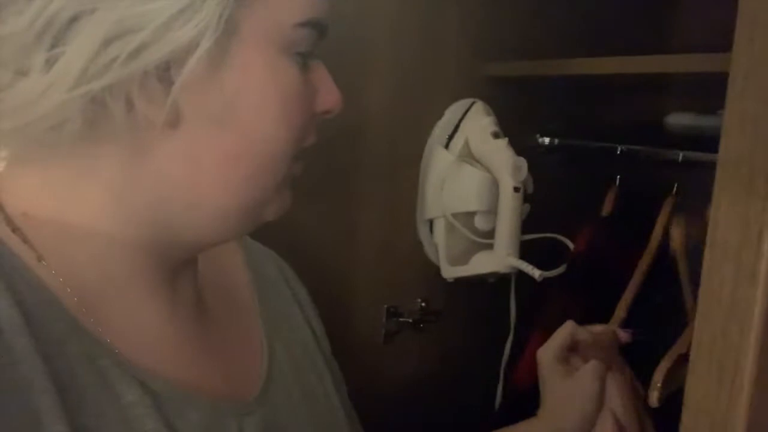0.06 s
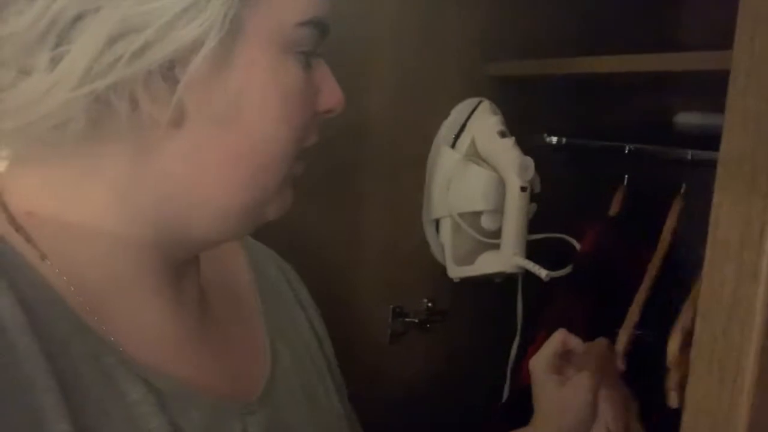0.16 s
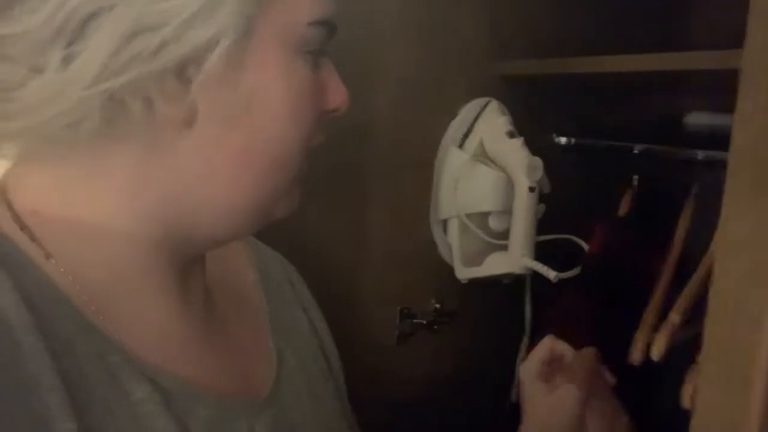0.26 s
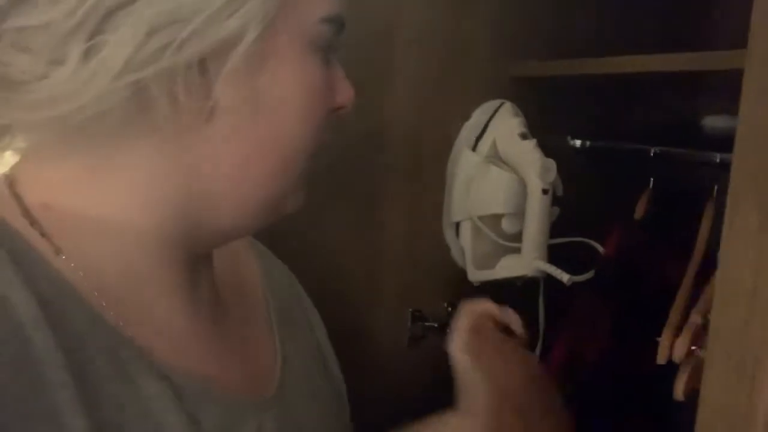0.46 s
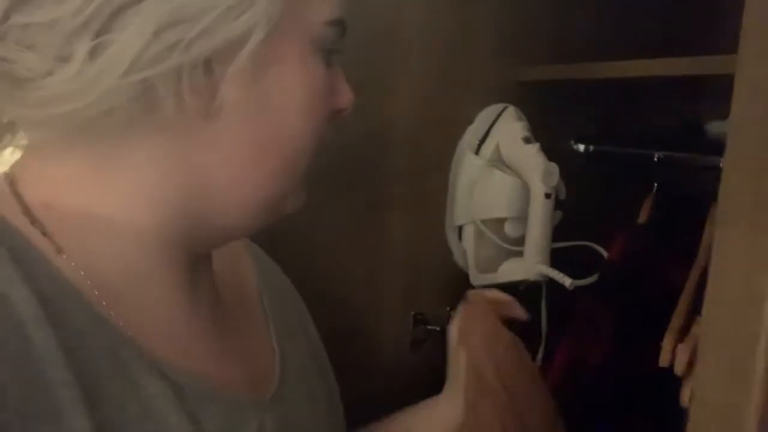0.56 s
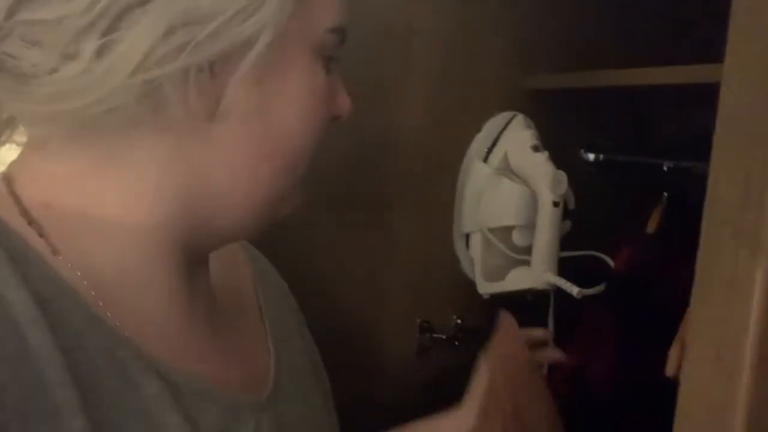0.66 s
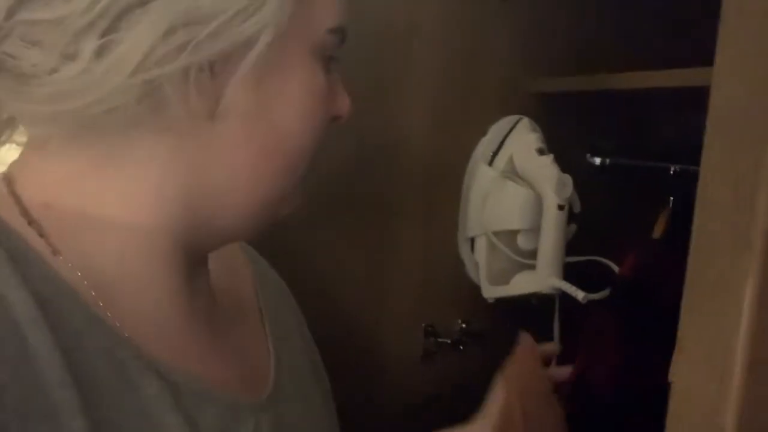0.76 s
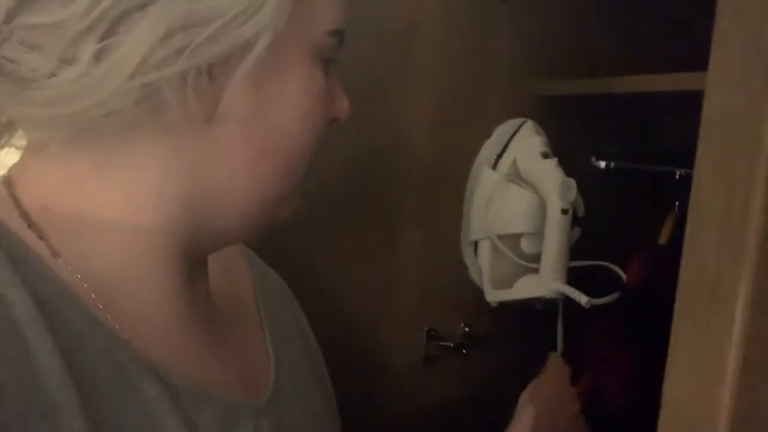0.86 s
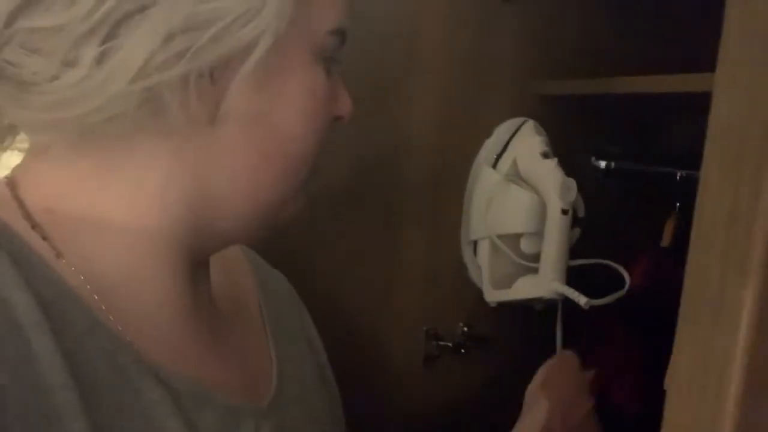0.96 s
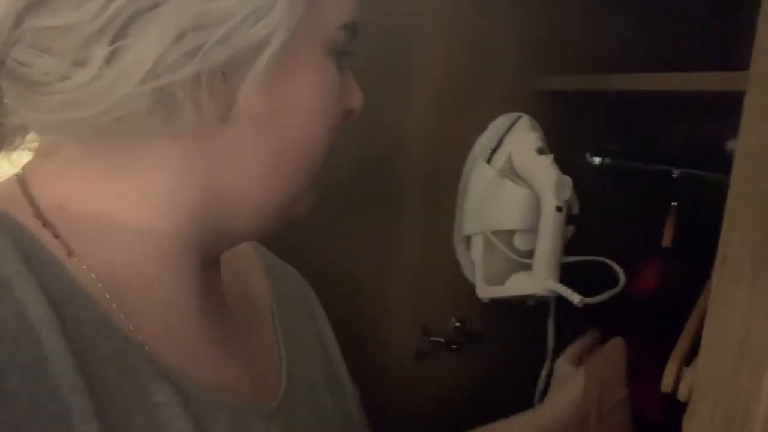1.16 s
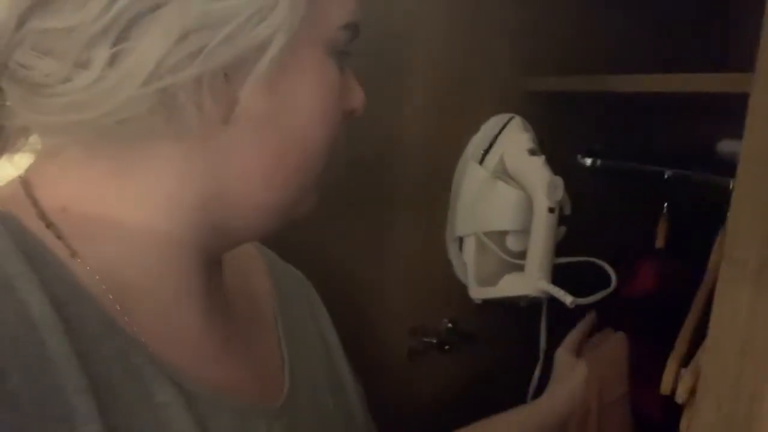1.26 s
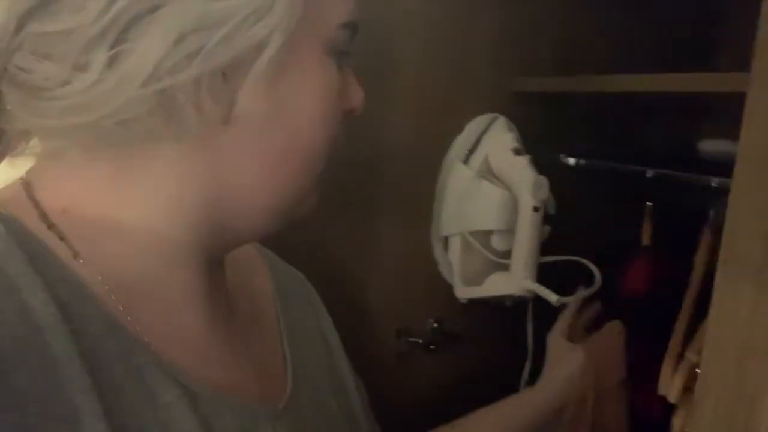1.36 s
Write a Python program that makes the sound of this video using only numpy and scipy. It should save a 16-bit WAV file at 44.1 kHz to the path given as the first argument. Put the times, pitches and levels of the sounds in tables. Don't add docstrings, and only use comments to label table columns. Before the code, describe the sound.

Wooden hangers clack on a metal closet rail. Hooks scrape and tick from 0.1 s, then a hard, bright clatter with a boxy thump hits at 0.2 s, bouncing until 0.4. A weaker clack follows at 0.46, a sharp strong one at 0.62 with light rattle. Soft finger taps at 0.7 and 0.8, a small clack at 0.86, faint ticks from 1.1 to 1.4. Low ventilation rumble throughout, close stereo, short wooden echoes.

```python
import sys
import numpy as np
from scipy import signal
from scipy.fft import rfft, irfft, next_fast_len
from scipy.io import wavfile

SR = 44100
rng = np.random.default_rng(int(sys.argv[2]) if len(sys.argv) > 2 else 0)


def makeup_ratio(level_db):
    decades = np.asarray(level_db, float) / 20
    return 10 ** decades


def digitize_waveform(pressure):
    field = np.atleast_2d(pressure).T
    bounded = np.clip(field, -1, 1)
    quanta = np.round(bounded * 32767).astype(np.int16)
    wavfile.write(sys.argv[1], SR, quanta)


N = 61739
SIZE = next_fast_len(N + SR)
HZ = np.maximum(np.arange(SIZE // 2 + 1) * SR / SIZE, 1)

# (frequency [Hz], level [dB])
RUMBLE_COLOUR = [(15, -47.5), (30, -18), (80, 6), (140, -10), (262, -12.5), (400, -37), (700, -32.5)]
# (frequency [Hz], width [Hz], level [dB])
DUCT_DRONES = [(75, 8, -55.5), (120, 37, -46.5), (194, 15, -55)]
# (frequency [Hz], level [dB])
AIR_COLOUR = [(400, 2.5), (1000, -9.5), (2200, -16.5), (6000, -21.5), (9700, -28.5), (12500, -19),
              (15500, -25)]
# (time [s], level [dB])
SLIDE_LEVEL = [
    (0, -53.5),
    (0.101, -47),
    (0.188, -35),
    (.3, -50.5),
    (0.451, -48.5),
]
# (time [s], level [dB], fade by 60 dB [s])
THUMPS = [
    (.002, -27.5, 0.13),
    (0.215, -30.5, 0.46),
    (0.232, -17.5, 0.076),
    (0.257, -27, 0.37),
    (0.36, -31, 0.14),
    (0.491, -25, 0.13),
    (0.634, -27.5, 0.31),
]

# (time [s], level [dB], chatter fade by 60 dB [s], brightness [dB], favoured pitch [Hz])
HOOK_TICKS = [
    (.1141, -42.5, 0.026, -10, 2900),
    (.135, -43, .06, -26.5, 6250),
    (.1506, -41.5, 0.021, -21, 3700),
    (.156, -37, 0.032, -31.5, 1299),
    (.175, -53, 0.16, -13, 1890),
]
CLACKS_A = [
    (.2055, -14.5, 0.021, -19, 3300),
    (.2105, -13.5, 0.012, 17.5, 5800),
    (.218, -16.5, 0.03, 10.5, 1266),
    (.235, -28.5, 0.12, 14.5, 5800),
    (.2505, -27, 0.045, 18.5, 2550),
    (.266, -32, 0.16, 10, 960),
    (.31, -44.5, 0.12, -13, 5800),
    (.3486, -29, 0.042, -44, 3370),
    (.351, -33.5, 0.05, -44, 1800),
    (.375, -41.5, 0.15, -35.5, 972),
]
CLACKS_B = [
    (.4633, -28, 0.033, -23.5, 3960),
    (.470, -31.5, 0.078, 4, 6120),
    (.479, -32.5, 0.033, 10.5, 3000),
    (.495, -42.5, 0.14, 3.5, 975),
    (.535, -45.5, 0.076, -23, 940),
    (.555, -51.5, 0.16, -19.5, 1297),
]
CLACKS_C = [(.606, -42.5, 0.18, -27.5, 2540), (.614, -31.5, .03, -11, 6500), (.6195, -17.5, 0.024, 2, 3930),
            (.6265, -16.5, 0.0088, 1.5, 3930), (.631, -24.5, 0.042, 0.5, 6500),
            (.635, -22.5, 0.016, 4.5, 3930), (.642, -29, 0.047, 8.5, 1385), (.652, -36, 0.027, 5.5, 1290),
            (.663, -44, 0.053, -10.5, 5800), (.677, -41.5, 0.03, -27, 3030), (.69, -44.5, .15, -30, 4900)]
CLACKS_D = [
    (1.148, -54, 0.026, -23, 5400),
    (1.1568, -59, 0.072, -49, 1506),
    (1.18, -65.5, 0.036, -42, 1303),
    (1.205, -69.5, 0.067, -30, 915),
    (1.2436, -71.5, 0.047, -20, 1620),
    (1.262, -71.5, .06, -25, 1300),
    (1.35, -81.5, 0.052, -12.5, 2005),
]
CLACKS_E = [
    (.855, -40, 0.025, -9, 3100),
    (.8575, -48, 0.017, -28, 5570),
    (.862, -47.5, 0.087, -56.5, 1360),
    (.885, -55.5, 0.17, -55.5, 1190),
    (.906, -63.5, 0.069, -47, 2960),
]
LAST_TICK = [
    (1.0874, -60, .01, 0, 4250),
    (1.095, -72, .02, -20, 4000),
]
RATTLE = [
    (.655, -47, 0.28, -25, 3010),
    (.72, -51, 0.33, -23, 5430),
    (1.2436, -70, 0.061, -28, 1610),
    (1.3975, -62, 0.024, -2, 3000),
]
# (frequency [Hz], level per Hz [dB])
CRACK_COLOUR = [(250, -25), (900, -9), (1400, 1.5), (2250, 8), (4000, 3.5), (7500, 4), (10500, -10),
                (15200, -25.5), (16300, -44)]

# (frequency [Hz], level [dB], fade by 60 dB [s])
PAIR_A = [(972, -8, 0.24), (1154, -9.5, 0.16), (1316, -4, 0.084), (1411.5, -8.5, 0.14), (1834, -8.5, .08),
          (2797, -6.5, 0.12), (3010, -13, .1), (3177, -3, .035), (4083, -4, .05), (4900, -11, 0.067),
          (5650, -10, .05), (6300, -6.5, 0.11), (633, -9.5, .08), (808, -9, 0.19)]
PAIR_B = [(418.3, -16, .3), (621.3, 1.5, 0.22), (817, -0.5, 0.13), (975, -9.5, .25), (940, -15.5, .2),
          (1124, -7, 0.13), (1297, -3.5, .4), (1800, -14, 0.075), (2157, -0.5, 0.0906), (3160, -12.5, 0.11),
          (3648, -27.5, .12), (3960, -15.5, 0.067), (5800, -6.5, 0.049)]
PAIR_C = [(562.5, -16, .1), (1172, -7, 0.047), (1310, -9, 0.16), (1575, -12, .12), (1800, -35.5, .1),
          (1970, -7, 0.3), (2690, -29, 0.093), (3067, -21, .08), (3080, -19, .05), (3570, -12.5, .12),
          (3930, -1, 0.08), (4900, 6, 0.0685), (5800, 3, .07), (6540, -10, 0.087)]
PAIR_D = [(915, -11.5, 0.3), (1230, -5, 0.059), (1346, -4, 0.079), (1530, -7.5, 0.069), (1680, -5, 0.094),
          (1840, -0.5, 0.056), (1930, 1, 0.092), (2500, -8, 0.11), (3900, -17, .1), (5830, -21, 0.061)]
PAIR_E = [(988, -8, .3), (1190, -12, .15), (1315, -9, 0.11), (1774, -17.5, 0.15), (2550, -18, 0.058),
          (2990, -6, 0.11), (3410, -22, 0.035), (3930, -10, 0.11), (4996, -3.5, 0.039)]
RAIL = [(1353, 5.5, 0.01), (1890, 5, 0.019), (2764, -4.5, 0.088), (3016, 1, .06), (3793, -11, .04),
        (4460, -10, 0.084), (4924, -5, 0.015), (5800, -13.5, 0.046), (6086, -5, 0.038)]
HOOK = [(3980, -4, .04), (4230, 0, .025)]
PANEL = [(114.5, 0.5, 0.054), (196.3, -15.5, 0.6), (211.9, -2.5, 0.16), (251.7, -15.5, 0.22),
         (330.4, -5.5, 0.055), (493.7, -1.5, 0.019), (605, -20, 0.34)]

# (time [s], level [dB])
SHELF_HITS = [
    (.465, -43),
    (.665, -40),
]
# (time [s], level [dB], first pitch [Hz])
TAPS = [
    (.711, -31, 350),
    (.815, -38, 650),
    (1.322, -46, 1050),
    (1.361, -45.5, 950),
    (1.398, -46, 700),
]
# (frequency [Hz], phase [radians])
PORT_LEAD = [(300, 0.5), (1120, 1.79), (1700, -1.5), (3960, -6.5), (5000, -8), (6030, -8), (8200, -9.5),
             (9800, -9), (11500, -11), (13200, -12.5)]
# (frequency [Hz], level [dB])
PORT_TILT = [(100, -2), (400, 0.3), (2400, -6.5), (9000, 3)]
# (frequency [Hz], fade by 60 dB [s])
CLOSET_T60 = [(200, 1), (1000, 0.53), (4000, 0.37), (12000, 0.17)]

RISE_S = .0006
TOUCHES_PER_S, TOUCH_SPREAD_DB, FIRST_TOUCH_DB = 2500, 3.5, 4
CRACK_DB, BRIGHT_HZ = 3, 9000
FAVOUR_DB, FAVOUR_OCTAVES = 13, .22
TWIN_SPLIT = 0.014
SLIDE_PER_S, SLIDE_HISS_DB = 1600, -6
RAIL_WANDER_DB, RAIL_WANDER_S = 6, .03
SHELF_HZ, SHELF_T60_S = 428, .7
TAP_HZ, TAP_SAG_S, TAP_T60_S = 250, .004, .03
RUMBLE_DB, RUMBLE_ALIKE, RUMBLE_LAG_S, RUMBLE_PAN_DB = -38.5, .86, -0.00023, -2.5
AIR_DB = -66
NEAR_ECHO_DB, NEAR_ECHO_T60_S = -2.5, .025
CLOSET_DB, UNLIKE_DB = -13, 3
UNLIKE_HZ, ECHO_LOW_HZ = 7900, 800
CEILING, CUTOFF_HZ = .9, 16600


def rms_one(x):
    return x / np.sqrt(np.mean(x ** 2) + 1e-20)


def at_log_hz(points, hz):
    table_hz, values = np.transpose(points)
    return np.interp(np.log(hz), np.log(table_hz), values)


def shaped(x, response):
    return irfft(rfft(x, SIZE) * response, SIZE)[..., :N]


def burst(s, db, t60):
    t = np.maximum(np.arange(N) / SR - s, 0)
    return np.minimum(t / RISE_S, 1) * makeup_ratio(db - 60 * t / max(t60, .005))


def touches(per_s):
    sizes = makeup_ratio(TOUCH_SPREAD_DB * np.minimum(rng.exponential(1, N), 4)) * rng.choice([-1, 1], N)
    return rms_one(sizes * (rng.random(N) < per_s / SR))


def ring(force, hz, t60):
    radius = makeup_ratio(-60 / (max(t60, .005) * SR))
    angle = 2 * np.pi * hz / SR
    return signal.lfilter([0, np.sin(angle)], [1, -2 * radius * np.cos(angle), radius ** 2], force + 1e-18)


def struck(force, modes, strengths):
    splits = TWIN_SPLIT * rng.uniform(0.84, 1, 14)
    total = 0
    for (hz, db, t60), split, strength in zip(modes, splits, strengths):
        t60 = min(t60, .045 + 180 / hz)
        lower = ring(force[0] * strength, hz, t60)
        upper = ring(force[1] * strength, hz * (1 + split), t60 / 2)
        total = total + makeup_ratio(db) * (lower + upper)
    return total


def ventilation():
    white = rng.standard_normal((2, SIZE))
    rumble = makeup_ratio(at_log_hz(RUMBLE_COLOUR, HZ)) / (1 + (HZ / 800) ** 4)
    colour = makeup_ratio(RUMBLE_DB) * rms_one(rumble)
    for hz, width_hz, db in DUCT_DRONES:
        peak = 1 / (1 + (2 * (HZ - hz) / width_hz) ** 2)
        colour = np.sqrt(colour ** 2 + makeup_ratio(db) ** 2 * peak ** 2 / np.mean(peak ** 2))
    shared = np.sqrt((1 + RUMBLE_ALIKE) / 2) * white[0]
    opposite = np.sqrt((1 - RUMBLE_ALIKE) / 2) * white[1] * [[1], [-1]]
    half = makeup_ratio(RUMBLE_PAN_DB / 2) * np.exp(-1j * np.pi * HZ * RUMBLE_LAG_S)
    low = shaped(shared + opposite, colour * np.array([half, 1 / half]))
    air_colour = makeup_ratio(at_log_hz(AIR_COLOUR, HZ)) * (HZ > 300)
    air = rms_one(shaped(rng.standard_normal((2, SIZE)), air_colour))
    return low + makeup_ratio(AIR_DB) * air


def slide():
    t = np.arange(N) / SR
    s, db = np.transpose(SLIDE_LEVEL)
    level = makeup_ratio(np.interp(t, np.append(s, s[-1] + 0.09), np.append(db, -110)))
    grit = np.array([touches(SLIDE_PER_S), touches(SLIDE_PER_S)])
    hiss = shaped(grit[0], makeup_ratio(at_log_hz(CRACK_COLOUR, HZ)) * (HZ > 300))
    knots = np.arange(0, N / SR + 1, RAIL_WANDER_S)
    wander = []
    for _ in RAIL:
        drift = np.interp(t, knots, rng.standard_normal(len(knots)))
        wander.append(makeup_ratio(RAIL_WANDER_DB * drift))
    rail = rms_one(struck(grit, RAIL, wander))
    return level * (rail + makeup_ratio(SLIDE_HISS_DB) * rms_one(hiss))


def panel_thumps():
    force = rng.standard_normal((2, N)) * sum(burst(*row) for row in THUMPS)
    return makeup_ratio(-31.5) * struck(force, PANEL, np.ones(14))


def favour(hz, centre_hz):
    octaves = np.log2(hz / centre_hz)
    return makeup_ratio(FAVOUR_DB * np.exp(-(octaves / FAVOUR_OCTAVES) ** 2))


def clacks(rows, modes, ring_db):
    grit = np.array([touches(TOUCHES_PER_S), touches(TOUCHES_PER_S)])
    first_touches = [int((row[0] + RISE_S) * SR) for row in rows]
    grit[:, first_touches] = makeup_ratio(FIRST_TOUCH_DB)
    noise = rms_one(shaped(grit[0] + rng.standard_normal(N), makeup_ratio(at_log_hz(CRACK_COLOUR, HZ))))
    bursts = np.array([burst(*row[:3]) for row in rows])
    treble = 1 / (1 + (BRIGHT_HZ / HZ) ** 8)
    crack = 0
    for envelope, (*_, bright_db, hz) in zip(bursts, rows):
        colour = favour(HZ, hz) ** 0.63 * makeup_ratio((bright_db + 8) * treble)
        crack = crack + envelope * shaped(noise, colour)
    mode_hz, clack_hz = np.array(modes)[:, :1], np.array(rows)[:, 4]
    strengths = favour(mode_hz, clack_hz) @ bursts
    return makeup_ratio(ring_db) * struck(grit, modes, strengths) + makeup_ratio(CRACK_DB) * crack


def shelf():
    total = 0
    for s, db in SHELF_HITS:
        hum = np.sin(2 * np.pi * SHELF_HZ * (np.arange(N) / SR - s))
        total = total + burst(s, db, SHELF_T60_S) * hum
    return total


def finger_taps():
    total = 0
    for s, db, first_hz in TAPS:
        t = np.maximum(np.arange(N) / SR - s, 0)
        sag = (first_hz - TAP_HZ) * TAP_SAG_S * (1 - np.exp(-t / TAP_SAG_S))
        total = total + burst(s, db, TAP_T60_S) * np.sin(2 * np.pi * (TAP_HZ * t + sag))
    return total


def ports(x):
    half = makeup_ratio(at_log_hz(PORT_TILT, HZ) / 2) * np.exp(.5j * at_log_hz(PORT_LEAD, HZ))
    return shaped(x, np.array([half, 1 / half]))


def unlike():
    return 1 / (1 + (HZ / UNLIKE_HZ) ** 6) / (1 + (ECHO_LOW_HZ / HZ) ** 2)


def near_walls(x):
    t = np.arange(SR // 20) / SR
    echo = rng.standard_normal((2, len(t))) * makeup_ratio(-60 * t / NEAR_ECHO_T60_S)
    echo = echo / np.sqrt(np.sum(echo[0] ** 2))
    return makeup_ratio(NEAR_ECHO_DB) * shaped(x, rfft(echo, SIZE) * unlike())


def closet(x):
    t = np.arange(SR // 2) / SR
    white = rfft(rng.standard_normal((3, SIZE)))
    tails = 0
    for hz in 125 * 2. ** np.arange(8):
        band = np.cos(np.pi / 2 * np.clip(np.log2(HZ / hz), -1, 1)) ** 2
        fade = makeup_ratio(-60 * t / max(at_log_hz(CLOSET_T60, hz), .05))
        rise = np.minimum(t / 0.00064, 1)
        tails = tails + irfft(white * band, SIZE)[:, :len(t)] * fade * rise
    wet = shaped(x, rfft(tails / np.sqrt(np.sum(tails[0] ** 2)), SIZE))
    return ports(wet[0]) + makeup_ratio(UNLIKE_DB) * shaped(wet[1:], unlike())


def scene():
    near = slide() + panel_thumps() + shelf() + finger_taps()
    near = near + clacks(HOOK_TICKS, RAIL, ring_db=-23.0)
    near = near + clacks(CLACKS_A, PAIR_A, ring_db=-30.0)
    near = near + clacks(CLACKS_B, PAIR_B, ring_db=-29.0)
    near = near + clacks(CLACKS_C, PAIR_C, ring_db=-29.5)
    near = near + clacks(RATTLE, RAIL, ring_db=-44.5)
    near = near + clacks(CLACKS_E, PAIR_E, ring_db=-23.5)
    near = near + clacks(LAST_TICK, HOOK, ring_db=-24.0)
    near = near + clacks(CLACKS_D, PAIR_D, ring_db=-21.0)
    return ports(near) + near_walls(near) + makeup_ratio(CLOSET_DB) * closet(near) + ventilation()


def roll_off(x):
    return signal.sosfilt(signal.butter(12, 16610, fs=SR, output="sos"), x)


def record(dry):
    limited = CEILING * np.tanh(dry / CEILING)
    top_cut = signal.cheby2(16, 50, CUTOFF_HZ, fs=SR, output="sos")
    mix = signal.sosfilt(top_cut, limited)
    return roll_off(mix)


dry = scene()
out = record(dry)
digitize_waveform(out)
```